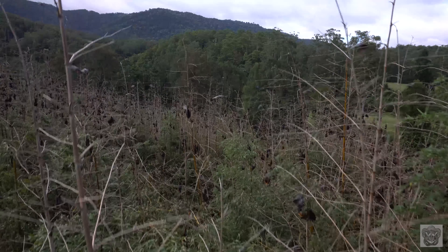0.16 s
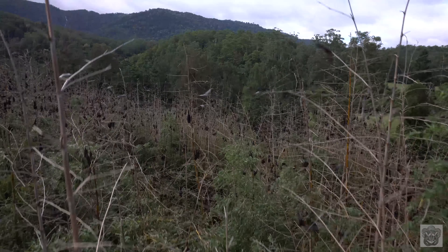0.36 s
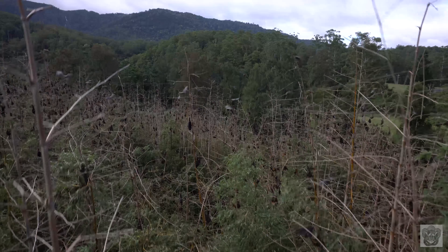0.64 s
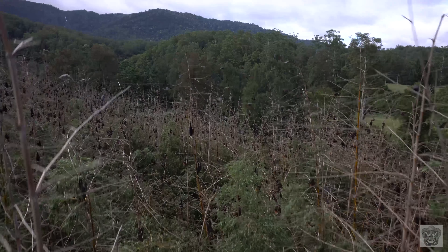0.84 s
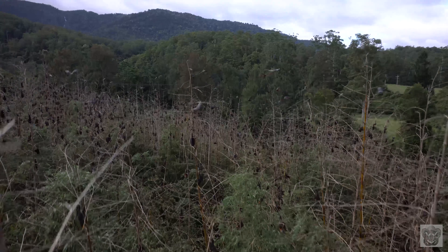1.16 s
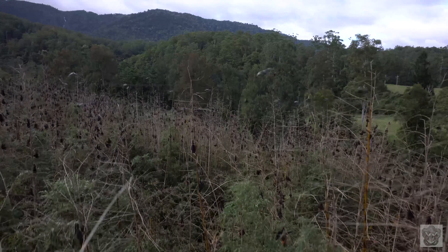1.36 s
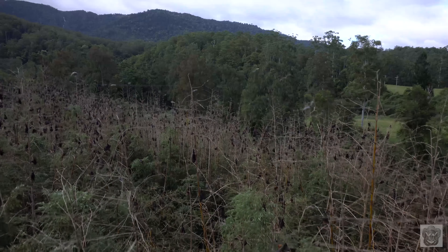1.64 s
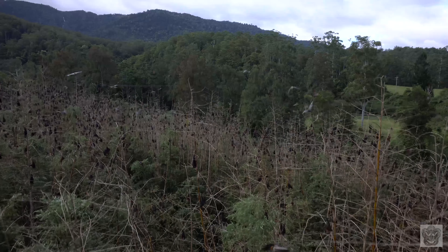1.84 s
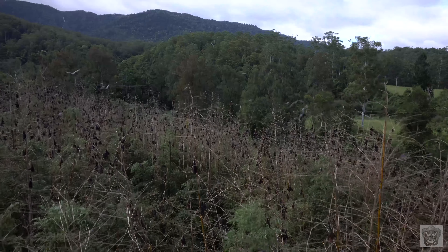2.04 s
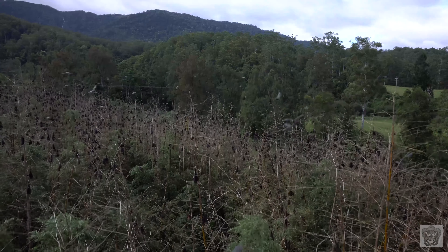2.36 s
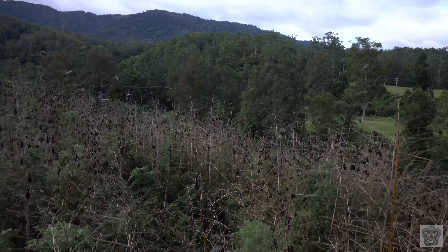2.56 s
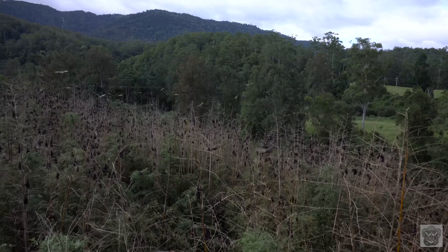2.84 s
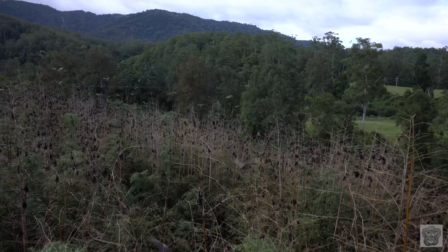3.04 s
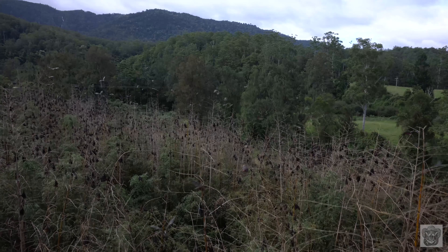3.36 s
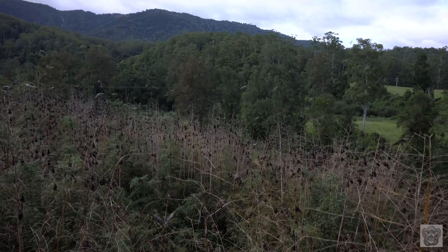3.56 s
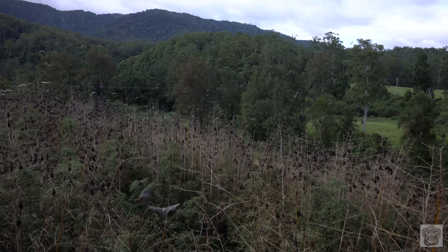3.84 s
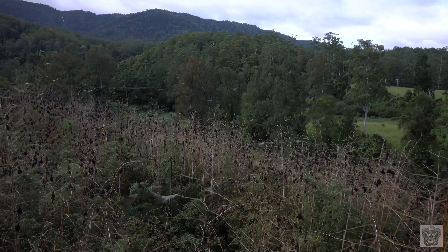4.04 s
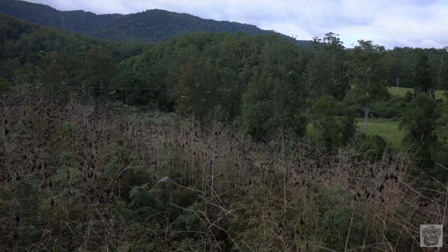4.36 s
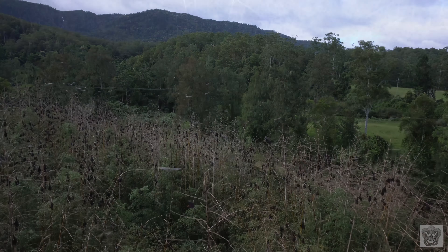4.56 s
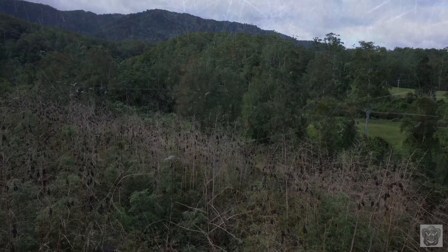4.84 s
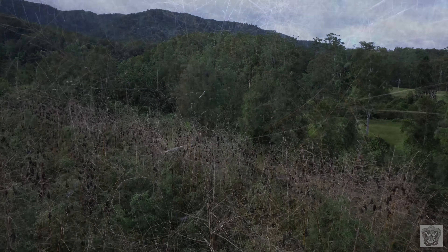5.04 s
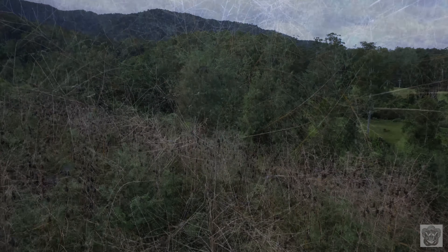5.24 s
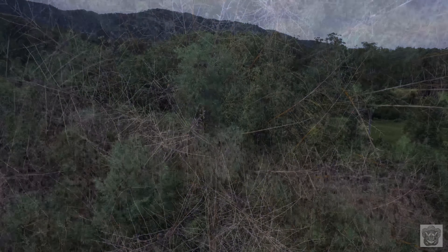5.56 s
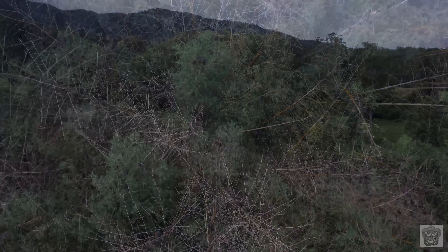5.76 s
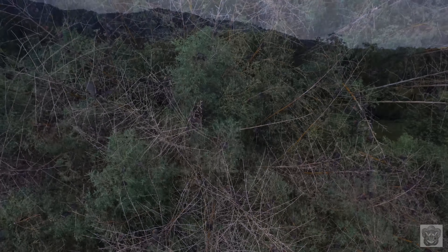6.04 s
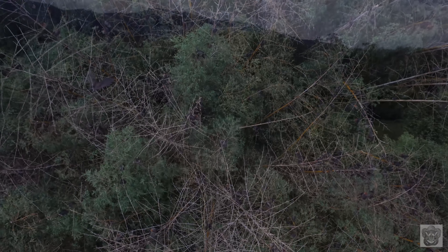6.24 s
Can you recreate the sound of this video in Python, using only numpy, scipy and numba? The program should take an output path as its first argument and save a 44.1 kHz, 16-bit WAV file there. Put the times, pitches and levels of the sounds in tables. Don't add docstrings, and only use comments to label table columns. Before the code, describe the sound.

A huge roost of fruit bats squeals in a dense shrill chorus left of centre, with barks and scolds, before crossfading to a second roost's screech.

```python
import sys
import numpy as np
from scipy import signal
from scipy.fft import rfft, irfft
from scipy.io import wavfile
from scipy.ndimage import uniform_filter1d
from numba import njit

SR = 44100
rng = np.random.default_rng(int(sys.argv[2]) if len(sys.argv) > 2 else 0)


def how_loud(loudness_db):
    steps = np.asarray(loudness_db, float) / 20
    return 10 ** steps


def master_out(mix):
    frames = np.transpose(np.atleast_2d(mix))
    ceiling = np.clip(frames, -1, 1)
    pcm = np.round(ceiling * 32767).astype(np.int16)
    wavfile.write(sys.argv[1], SR, pcm)


N = 282681
HZ = np.fft.rfftfreq(N, 1 / SR)


def along(table, hz):
    at, value = np.transpose(table)
    return np.interp(np.log(hz + 1), np.log(at + 1), value)


def unit(x):
    return x / np.sqrt(np.mean(x ** 2))


def shaped(x, gain):
    return irfft(rfft(x) * gain, N)


def wobble(rate):
    return unit(shaped(rng.standard_normal(N), 1 / (1 + (HZ / rate) ** 4)))


def bump(t, at, length):
    return np.cos(np.pi * np.clip((t - at) / length, -.5, .5)) ** 2


def fade_db(t):
    fade_out_s, fade_db_per_s, fade_in_s, rise_db_per_s = 4.216, 12, 5.638, 9
    fall = fade_db_per_s * (np.clip(t, fade_out_s, fade_in_s) - fade_out_s)
    return rise_db_per_s * np.maximum(t - fade_in_s, 0) - fall


@njit
def voices(calls, colour, orders, shake, flutter):
    out = np.zeros((2, len(shake)))
    for c in range(len(calls)):
        t, length, hz0, hz1, arch, left, right, lag, rough = calls[c]
        start, n, phase = int(t * SR), int(length * SR), 1. * c
        for i in range(max(0, 40 - start), min(n, len(shake) - start - 40)):
            u, j = i / n, (7919 * c + i) % len(shake)
            bow = 4 * u * (1 - u)
            hz = (hz0 + (hz1 - hz0) * u) * (1 + arch * (bow - 1)) + rough * shake[j]
            phase += 2 * np.pi * hz / SR
            v = 0.
            for k in range(1, orders + 1):
                v += colour[min(int(k * hz / 10), len(colour) - 1)] * np.sin(k * phase + k * k)
            v *= min(1., 2 * bow * max(1., length / .07)) * flutter[j]
            out[0, start + i] += left * v
            out[1, start + i + int(lag)] += right * v
    return out


def trees(x, t60, wet_db):
    t = np.arange(int(.4 * SR)) / SR
    tails = rng.standard_normal((2, len(t))) * np.exp(-np.log(1000) * t / t60)
    tails *= how_loud(wet_db) / np.sqrt(np.sum(tails ** 2, axis=1, keepdims=True))
    return x + signal.fftconvolve(x, tails, axes=1)[:, :N]


# f/Hz, coherence/0-1
ALIKE = [(60, 1), (130, 0.9), (300, 0.15), (700, 0.25), (1400, 0.3), (3300, 1), (5500, 0.72), (7700, 0.74),
         (13000, 0.4)]


def diffuse(table):
    a, b = rfft(rng.standard_normal((2, N))) * how_loud(along(table, HZ))
    alike = np.clip(along(ALIKE, HZ), 0, 1)
    return unit(irfft(np.array([a, alike * a + np.sqrt(1 - alike ** 2) * b]), N))


# f/Hz, level/dB per Hz
THROAT = [(710, -49), (1200, -11), (1590, -8.5), (1840, -4), (2800, 0), (3470, 3.5), (3820, 1.5),
          (5270, -1.5), (6260, -9.5), (7600, -12.5), (8640, -17), (9420, -16.5), (15600, -44.5)]


def crowd(count=1700, orders=7, clumps=6):
    u, g = rng.random((count, 4)).T, rng.standard_normal((count, 4)).T
    start = (np.arange(count) + 8 * u[0]) / count * (N / SR + .2) - .2
    length = .018 * 6.0 ** u[2]
    pitch_hz = 2100 * 2 ** (1.05 * u[1])
    end_hz = pitch_hz * (1 + .07 * g[2])
    arch = .15 * u[3] ** 3
    size, pan = how_loud(2.7 * g[0]), how_loud(1.5 * g[1])
    lag = np.clip(2.2 * g[3], -30, 30)
    rough_hz = 30 + 130. * u[3][::-1] ** 3
    calls = np.transpose([start, length, pitch_hz, end_hz, arch, size * pan, size / pan, lag, rough_hz])
    colour = how_loud(along(THROAT, 10. * np.arange(1700)))
    shake, flutter = wobble(276), np.abs(1 + 0.41 * wobble(190))
    mix = np.zeros((2, N))
    for k in range(clumps):
        near = voices(calls[k::clumps].copy(), colour, orders, shake, flutter)
        mix += trees(near, t60=0.29, wet_db=0.5)
    return unit(mix)


# t/s, chorus level/dB before the fade
SWELL = [(0.0, -22), (.22, -23.5), (.35, -22.5), (.77, -24), (.88, -21.5), (1.15, -23.5), (1.76, -25),
         (1.9, -24.5), (2.17, -26), (2.35, -24), (2.97, -24.5), (3.19, -26), (3.35, -24.5), (3.76, -26.5),
         (4.07, -25.5), (5.17, -23.5), (5.3, -26), (5.65, -23)]
# middle t/s, length/s, treble lift level/dB
SQUABBLES = [(.35, 0.55, 3), (.62, 0.32, 4), (1.0, 0.13, 0.5), (1.5, 0.85, 4.5), (1.98, 0.61, 5),
             (2.618, 0.67, 2.5), (2.86, 0.17, 0.5), (3.623, 0.72, 4.5), (3.962, 0.2, 5), (4.29, 0.19, 3.5),
             (4.854, 0.23, 4), (5.085, 0.51, 4), (5.502, 0.65, 5.5), (6.07, 0.49, 7.5), (6.323, 0.39, 8.5)]


def chorus():
    t = np.arange(N) / SR
    cut_s, cut_length_s, cut_db, second_roost_db = 5.86, 0.13, -0.5, -26
    calm_shrill_db = -10.5
    s, db = np.transpose(SWELL + [(cut_s, second_roost_db)])
    level_db = np.interp(t, s, db) + fade_db(t) + cut_db * bump(t, cut_s, cut_length_s)
    shrill_db = calm_shrill_db + sum(lift * bump(t, at, length) for at, length, lift in SQUABBLES)
    roost = crowd() + how_loud(-3) * diffuse(THROAT)
    treble = shaped(roost, 1 / (1 + (6200 / (HZ + 1)) ** 8))
    return how_loud(level_db - 2.0) * (roost + (how_loud(shrill_db + 14.5) - 1) * treble)


# f/Hz, level/dB per Hz
VALLEY = [(15, -50), (25, -44), (48, -5.5), (87, -6.5), (308, -10), (479, -4.5), (525, -8.5), (716, -9.5),
          (943, -7.5), (1090, -4.5), (1220, -10), (1580, -17), (2000, -2.5), (2600, -41), (4400, -120)]


def valley():
    valley_db = -50.5
    return how_loud(valley_db + fade_db(np.arange(N) / SR) + 6.5) * diffuse(VALLEY)


def score(table, rise_per_s, pan_db, scatter_db=3):
    t, length, hz, db = np.transpose(table)
    half = rise_per_s * length / 2
    bearing_db = pan_db + scatter_db * rng.standard_normal(len(t))
    return np.transpose([t, length, hz * (1 - half), hz * (1 + half), db, bearing_db])


def glides(table, shake_hz, rough, flutter, arch):
    t, length, hz0, hz1, db, pan_db = np.transpose(table)
    right = how_loud(db - pan_db + along(LEAN, hz0))
    calls = [t, length, hz0, hz1, arch + 0 * t, how_loud(db), right, 0 * t, rough * hz0]
    shimmer = np.abs(1 + flutter * wobble(70))
    return np.sqrt(2) * voices(np.transpose(calls), np.ones(2), 1, wobble(shake_hz), shimmer)


# t/s, length/s, f/Hz, left level/dB
SQUEALS = [(0, 0.053, 2180, -29.5), (.086, 0.11, 2180, -39), (.27, 0.083, 5370, -27),
           (.44, 0.084, 2800, -32), (.578, .045, 4780, -28.5), (.655, 0.085, 2450, -36),
           (.73, .16, 2416, -34), (.728, 0.065, 2150, -37), (.876, 0.089, 2830, -26.5),
           (1.668, .054, 2970, -30.5), (1.75, .051, 3110, -32), (1.895, 0.061, 2660, -32),
           (2.025, 0.072, 2880, -30), (2.278, 0.062, 2980, -34), (2.76, 0.13, 3020, -32),
           (3.471, .085, 2970, -33), (3.775, .039, 2050, -37), (4.089, .051, 2245, -37),
           (4.185, 0.054, 2850, -23), (4.559, 0.079, 3085, -40), (4.669, 0.046, 2540, -39),
           (4.809, .074, 2420, -49), (5.11, 0.088, 4160, -40), (4.26, .12, 2800, -35),
           (5.119, 0.066, 2250, -44), (5.183, 0.062, 2495, -46), (5.235, 0.057, 2170, -46),
           (5.27, .071, 2515, -47), (5.462, .036, 2540, -44.5), (5.508, 0.061, 2500, -45)]
# t/s, length/s, f/Hz, left level/dB
WHISTLES = [(.31, .071, 9300, -35.5), (.565, 0.078, 9435, -39), (.571, .056, 7070, -40),
            (1.343, .054, 10160, -41), (1.526, 0.062, 7705, -36), (1.57, 0.087, 8760, -39),
            (1.686, .103, 10090, -39), (1.979, 0.074, 7535, -37), (1.999, 0.08, 8260, -34),
            (2.08, 0.048, 9500, -39), (2.347, 0.086, 9195, -41), (2.408, 0.14, 7655, -38),
            (3.613, .094, 5385, -38), (3.706, 0.11, 10610, -48), (3.749, 0.084, 7925, -48),
            (4.118, .054, 4675, -32.5), (4.791, 0.074, 9445, -52), (5.003, 0.071, 9085, -48),
            (5.012, .065, 7640, -48), (5.116, 0.057, 8750, -51), (5.555, 0.07, 8005, -52),
            (4.95, .14, 5310, -41), (1.55, 0.116, 4320, -32)]


def squeals():
    rows = np.vstack([score(SQUEALS, rise_per_s=.1, pan_db=12.5), score(WHISTLES, rise_per_s=.1, pan_db=9.5)])
    return glides(rows, 180., rough=.009, flutter=.45, arch=.004) * how_loud(-1.2)


# t/s, length/s, f/Hz, left level/dB
SCOLDS = [(.31, 0.11, 3410, -31), (.414, 0.15, 3390, -34), (.6, 0.036, 3440, -30), (.92, .08, 3310, -36),
          (.985, 0.093, 3375, -30), (1.146, 0.063, 3510, -26.5), (1.291, 0.17, 3370, -32.5),
          (2.36, 0.063, 3600, -30), (2.04, 0.12, 3420, -34), (1.1, 0.084, 3420, -38),
          (1.503, 0.26, 3390, -34), (1.918, .051, 3610, -34), (2.681, .1, 3360, -36),
          (2.8, 0.11, 3550, -32), (2.22, 0.114, 3024, -35), (3.616, 0.11, 3590, -34),
          (3.75, .12, 3580, -35), (3.76, 0.16, 3250, -34), (4.812, .17, 3420, -43),
          (6.153, .048, 3370, -45)]


def scolds():
    return glides(score(SCOLDS, rise_per_s=.1, pan_db=12.5), 220., rough=.011, flutter=.5, arch=.01)


# t/s, peak level/dB, length/s
BARKS = [
    (.33, -29, .05),
    (.835, -27, .035),
    (1.865, -29, .035),
    (2.09, -30, .05),
    (2.8, -29, .035),
    (2.855, -25, .035),
    (3.035, -31, .03),
    (3.935, -27, .06),
    (4.29, -31, .04),
    (5.915, -38, .045),
]


def barks():
    t, env = np.arange(N) / SR, np.zeros(N)
    for at, db, length in BARKS:
        u = np.clip((t - at) / length, 0, 1)
        env += how_loud(db) * np.sin(np.pi * u ** .7) ** 2
    noise = shaped(rng.standard_normal(N), how_loud(along(THROAT, HZ)) * (HZ / 4000) ** .7)
    return env * unit(noise) * np.abs(1 + .4 * wobble(200))


# t/s, length/s, left level/dB
COOS = [
    (.5, .074, -49.5),
    (.88, 0.04, -48),
    (.97, .15, -50),
    (1.49, .26, -50),
    (2.25, 0.056, -47),
]
# t/s, length/s, start f/Hz, end f/Hz, left level/dB
BIRDS = [(.53, 0.066, 1104, 1112, -42), (0.979, 0.074, 1072, 1158, -43), (1.108, 0.059, 1073, 1122, -39.5),
         (1.461, 0.08, 1113, 1065, -46), (1.745, 0.036, 996, 1033, -49), (1.92, .091, 823, 866, -50),
         (2.141, 0.067, 1010, 1030, -50), (2.264, .056, 1094, 1025, -46), (2.469, .074, 1013, 1027, -46),
         (3.41, .13, 1100, 1134, -44), (4.04, 0.09, 976, 1077, -47), (4.1, 0.068, 1080, 1160, -42.5),
         (4.25, .063, 960, 897, -50), (4.969, .044, 930, 940, -53), (5.783, .05, 1000, 1010, -59)]


def far_birds():
    coo_hz, pan_db = 491, 10.5
    coos = [(t, length, coo_hz, coo_hz, db) for t, length, db in COOS]
    table = [(*row, pan_db) for row in BIRDS + coos]
    return glides(table, 60., rough=.02, flutter=.45, arch=.05)


# t/s, length/s, top f/Hz, left level/dB
CHIRPS = [
    (2.3, 0.03, 7400, -34),
    (2.9, 0.022, 7750, -34),
    (2.962, 0.041, 7050, -37),
    (3.012, .036, 7050, -38),
    (3.038, 0.027, 7950, -41),
    (3.552, 0.05, 6900, -40),
    (3.605, 0.033, 6950, -35),
    (3.658, .04, 7050, -33.5),
    (3.712, .048, 7000, -32),
]


def chirps():
    return glides(score(CHIRPS, rise_per_s=1.6, pan_db=8), 200., rough=.006, flutter=.3, arch=.1)


def clear_call(curve, overtones_db):
    s, hz, db = np.transpose(curve)
    t = np.arange(N) / SR
    pitch = uniform_filter1d(np.interp(t, s, hz), size=300) + 20 * wobble(200)
    phase = 2 * np.pi * np.cumsum(pitch) / SR
    stack = sum(how_loud(d) * np.sin((k + 1) * phase) for k, d in enumerate(overtones_db))
    return stack * how_loud(np.interp(t, s, db, left=-150, right=-150) + 6)


# t/s, f/Hz, level/dB
WAIL = [
    (3.615, 2342, -47),
    (3.635, 2440, -33),
    (3.787, 2602, -34.5),
    (3.895, 2727, -31),
    (3.949, 2970, -30.5),
    (3.999, 2885, -34.5),
    (4.01, 2910, -38),
]
WAIL_DB = [0.5]


def wail():
    return clear_call(WAIL, WAIL_DB) * np.abs(1 + .25 * wobble(90))


# t/s, length/s, f/Hz, left level/dB
SCREECH = [
    (5.93, .34, 4250, -41),
    (6.28, .2, 3600, -38),
]


def screech():
    return glides(score(SCREECH, 0, pan_db=5, scatter_db=0), 900., rough=.13, flutter=.25, arch=0.)


TRILL_DB = [-2, 0, -7, -25]


def trill():
    start_s, first_low_s, beat_s, climb = 6.264, 6.3, .048, .62
    low_hz, top_hz = 2850, 3680
    level_db, dip_db, swell_db_per_s = -47, 4, 45
    s = np.arange(start_s, N / SR, 1e-3)
    beat = (s - first_low_s) / beat_s % 1
    height = np.interp(beat, [0, climb / 2, climb, 1], [0, .75, 1, 0])
    db = level_db + swell_db_per_s * (s - start_s) - dip_db * (1 - height)
    db -= 15 * np.clip(1 - (s - start_s) / .012, 0, 1)
    return clear_call(np.transpose([s, low_hz + (top_hz - low_hz) * height, db]), TRILL_DB)


# t/s, f/Hz, level/dB
ANSWER = [
    (6.286, 2130, -60),
    (6.292, 2125, -42),
    (6.305, 2100, -42),
    (6.318, 1900, -52),
]
ANSWER_DB = [-20, -12, 0, -1, -14, -14]


def answer():
    return clear_call(ANSWER, ANSWER_DB)


# f/Hz, level/dB
LEAN = [(60, 0.0), (110, -0.5), (200, -0.5), (380, 5.0), (700, 2.0), (1290, 5.0), (2380, 6.0), (4400, 4.5),
        (8120, 5.0), (15000, 0.5)]
# f/Hz, phase/rad
LEAD = [(0, 0), (350, 1.3), (860, 3.7), (1810, 4.6), (2410, 4.7), (2930, 5.5), (5430, 6), (8600, 6.3),
        (10300, 7.5), (15300, 12)]


def at_ports(air):
    weaker = how_loud(-along(LEAN, HZ) - .4 * (HZ > 800))
    at, lead = np.transpose(LEAD)
    return np.array([air[0], shaped(air[1], weaker * np.exp(-1j * np.interp(HZ, at, lead)))])


def scene():
    near = squeals() + scolds() + barks() + chirps() + wail() + screech() + trill() + answer()
    close = trees(near, t60=.15, wet_db=-10)
    birds = trees(far_birds(), t60=.25, wet_db=-6)
    return at_ports(chorus() + valley() + close + birds)


def top_cut(x):
    return signal.sosfilt(signal.butter(12, 15740, fs=SR, output="sos"), x)


def record(dry):
    return top_cut(dry)


dry = scene()
out = record(dry)
master_out(out)
```